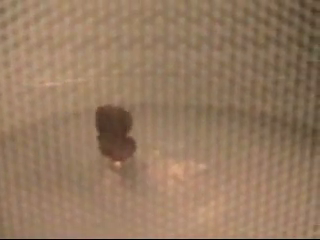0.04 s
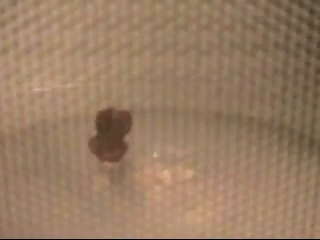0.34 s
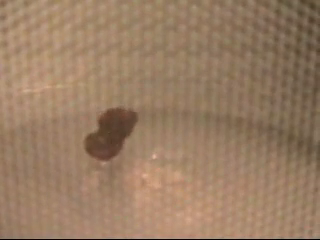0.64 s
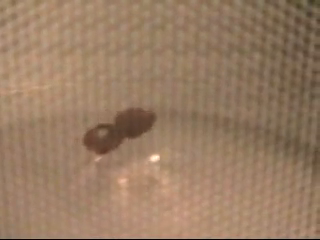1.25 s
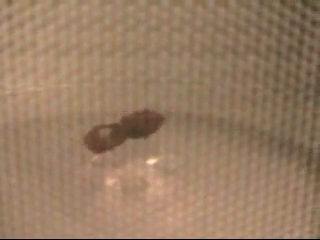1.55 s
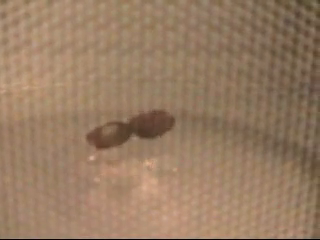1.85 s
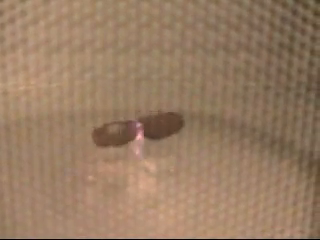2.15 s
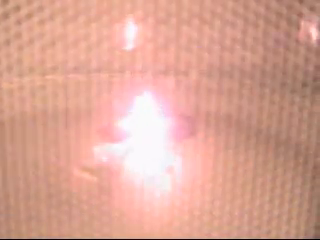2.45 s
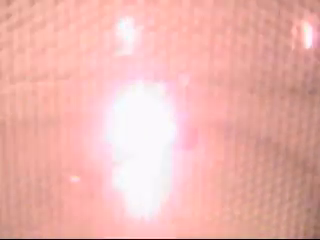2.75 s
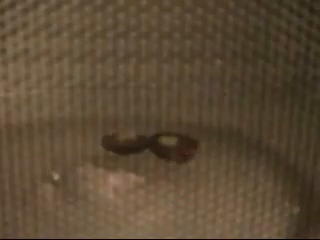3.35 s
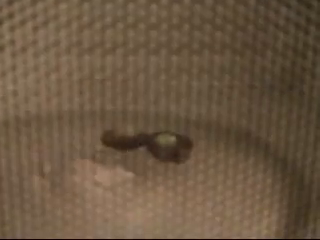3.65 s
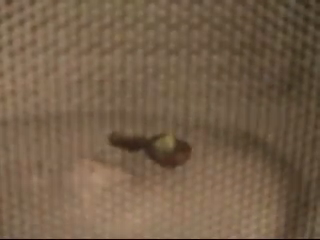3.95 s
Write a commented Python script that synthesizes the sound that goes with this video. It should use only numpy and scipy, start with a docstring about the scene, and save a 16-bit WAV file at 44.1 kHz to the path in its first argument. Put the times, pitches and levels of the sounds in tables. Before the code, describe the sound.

A microwave oven hums while grapes inside arc with a harsh electrical buzz, then stop abruptly.

```python
"""A microwave oven runs: its transformer hums and its cooling fan whirs, beating against the hum.
Two grapes inside spit juice and strike an arc that snaps and fries once per mains cycle,
rings the metal cavity and shifts the hum toward its odd harmonics.
The plasma flutters, flares and goes out at once, leaving the juice to sizzle faintly."""
import sys
import numpy as np
from scipy import signal
from scipy.fft import rfft, irfft
from scipy.io import wavfile
from scipy.ndimage import uniform_filter1d

SR = 44100
rng = np.random.default_rng(int(sys.argv[2]) if len(sys.argv) > 2 else 0)


def pcm_store(signal):
    """Save signal as 16-bit PCM."""
    levels = np.round(np.clip(np.atleast_2d(signal), -1, 1) * 32767)
    wavfile.write(sys.argv[1], SR, levels.astype(np.int16).T)


N = 176400
MAINS_HZ, CREST_S = 59.974, 1.3742
ARC_ON_S, ARC_OFF_S, STRIKE_S, QUENCH_S = 2.207, 3.297, 0.12, 0.0098


def undb(db):
    """Decibels to gain."""
    return 10 ** (np.asarray(db) / 20)


def unit(x):
    """Scale to rms 1."""
    return x / np.sqrt(np.mean(x ** 2))


def curve(rows):
    """Join (time_s, value) rows by straight lines; hold the ends."""
    return np.interp(np.arange(N) / SR, *np.array(rows).T)


def swells(t, rows):
    """Bell-shaped envelopes from (centre_s, half_length_s, level_db) rows."""
    return sum(undb(db) * np.exp(-((t - centre_s) / half_s) ** 2) for centre_s, half_s, db in rows)


def colour(x, points):
    """Minimum-phase filter through (freq_hz, gain_db) points."""
    hz, db = np.array(points).T
    size = 2 * N
    bin_hz = np.arange(N + 1) * SR / size
    gain = undb(np.interp(np.log(bin_hz + 1), np.log(hz), db))
    cepstrum = irfft(np.log(gain))
    cepstrum[1:N] *= 2
    cepstrum[N + 1:] = 0
    return irfft(rfft(x, size) * np.exp(rfft(cepstrum)))[:N]


def resonate(x, rows):
    """Add (centre_hz, width_hz, gain_db) resonances to x."""
    return x + sum(undb(db) * signal.lfilter(*signal.iirpeak(hz, hz / width_hz, fs=SR), x)
                   for hz, width_hz, db in rows)


def walk(rate_hz):
    """Smooth random wander, rms 1."""
    hold = int(SR / rate_hz)
    steps = rng.standard_normal(N)[np.arange(N) // hold]
    return unit(uniform_filter1d(uniform_filter1d(steps, hold), hold))


def crackle(spread_db):
    """Dense tiny bursts of unequal size."""
    return unit(rng.standard_normal(N) * undb(spread_db * walk(2500)))


# mains_multiple, rest_db, arcing_db
HUM_HARMONICS = [(2, -18.5, -28.5), (3, -54, -27), (4, -42, -54), (5, -42.5, -24), (6, -21.5, -26),
                 (7, -42.5, -33), (8, -38.5, -36.5), (10, -21.5, -23.5), (11, -37, -39), (12, -34, -41),
                 (15, -46, -43), (17, -47, -44), (19, -48.5, -51.5), (20, -50, -54.5), (21, -60.5, -56),
                 (23, -49.5, -49.5)]
# Slow swings in the hum's level: time_s, gain_db
HUM_LOAD = [(0, -2.5), (.55, -2), (.75, -0.9), (1.1, -2), (1.28, -1), (1.4, 0.5), (2.0, -0.3), (2.25, -2),
            (2.52, -4), (2.75, 0.5), (3.05, 1), (3.3, -2), (3.48, -1), (3.72, -2), (4, -3.5)]
# time_s, level_db
HUM_FUNDAMENTAL = [(0, -43), (.6, -45), (.9, -37.5), (1.55, -47), (2.05, -40), (2.25, -41), (2.4, -33.5),
                   (2.9, -30), (3.15, -30.5), (3.35, -35), (3.68, -34.5), (4, -38)]


def hum(t, cycles):
    """Transformer and magnetron: mostly even harmonics at rest; odd ones rise under the arc's load."""
    odd_lag_cycles = 0.3263
    burning = np.clip((t - ARC_ON_S) / STRIKE_S, 0, 1) * np.clip((ARC_OFF_S - t) / QUENCH_S + 1, 0, 1)
    harmonics = 0
    for k, rest_db, arcing_db in HUM_HARMONICS:
        k = round(k)
        waver_db = 0.16 * walk(7) + 1.24 * burning * walk(14)
        gain = undb(rest_db) * (1 - burning) + undb(arcing_db) * burning
        harmonics += gain * undb(waver_db) * np.cos(2 * np.pi * k * (cycles - k % 2 * odd_lag_cycles))
    fundamental = undb(curve(HUM_FUNDAMENTAL)) * np.sin(2 * np.pi * cycles)
    return np.sqrt(2) * (harmonics * undb(curve(HUM_LOAD)) + fundamental)


# shaft_multiple, level_db
BLADE_TONES = [(4, -27.5), (5, -40), (8, -30), (12, -37.5), (16, -38.5), (28, -47), (32, -46.5)]
# pitch_hz, level_db
CASING_PANELS = [(943, -39), (1249, -50.5), (1669, -50.5)]
# freq_hz, relative_db
AIR_SPECTRUM = [(25, -82.5), (60, -68), (105, -57), (170, -55.5), (250, -52), (350, -48.5), (450, -57),
                (560, -56), (900, -56.5), (1080, -66), (1420, -63.5), (2000, -71), (2600, -77.5),
                (3600, -84), (4800, -93), (6200, -105), (9500, -113), (12000, -103)]
# centre_hz, width_hz, gain_db
DUCT_MODES = [(2250, 130, -9.5), (2490, 110, -1), (3070, 120, -11), (3620, 260, -7), (4500, 400, -5)]


def fan(t, cycles):
    """Blade tones, shaken panels and ducted air throbbing with the hum; the arc's load slows the shaft."""
    shaft_hz, sag_hz, lead_turns, air_db = 45.728, 0.075, 0.018, -26.5
    burnt_s = np.clip(t, ARC_ON_S, ARC_OFF_S) - ARC_ON_S
    turns = lead_turns + shaft_hz * (t - CREST_S) - sag_hz * burnt_s + 0.005 * walk(3)
    blades = sum(undb(db + 1.1 * walk(13)) * np.cos(2 * np.pi * round(k) * turns)
                 for k, db in BLADE_TONES)
    panels = sum(undb(db + 3.2 * walk(12)) * np.cos(2 * np.pi * hz * t + 0.89 * walk(14))
                 for hz, db in CASING_PANELS)
    throb = 1 + 0.16 * np.cos(4 * np.pi * cycles)
    air = colour(rng.standard_normal(N) * throb, AIR_SPECTRUM)
    air = unit(resonate(air, DUCT_MODES))
    return np.sqrt(2) * (blades + panels) + undb(air_db + 0.34 * walk(4.6)) * air


# centre_s, half_length_s, level_db
JUICE_SPITS = [(1.14, 0.018, -54), (2.277, 0.039, -48.5)]
# freq_hz, relative_db
SPIT_SPECTRUM = [(1500, -17), (3000, 2), (4550, 2.5), (5500, -11), (6300, -14), (9500, -20), (12000, -13)]


def spits(t):
    """Juice spits brightly through the grape skin."""
    return swells(t, JUICE_SPITS) * unit(colour(crackle(spread_db=1.5), SPIT_SPECTRUM))


# centre_hz, width_hz, gain_db
CAVITY_MODES = [(1345, 100, 1), (1460, 100, 2), (1794, 29, 0), (1910, 60, 1.5), (2548, 92, 6.5),
                (2870, 45, 2), (3023, 45, 7), (3630, 120, -1.5), (4520, 35, 0.5), (4730, 70, 0),
                (6000, 65, 4)]


def cavity(x, t, t60_s=0.1, walls_db=-8):
    """The metal box rings and scatters sound between its walls."""
    ringing = resonate(x, CAVITY_MODES)
    walls = rng.standard_normal(N) * np.exp(-np.log(1000) * t / t60_s)
    walls /= np.sqrt(np.sum(walls ** 2))
    return ringing + undb(walls_db) * signal.fftconvolve(ringing, walls)[:N]


def snaps(cycles, grit=0.1, decay_s=0.0012, scatter_db=1.4):
    """One pressure impulse per cycle, each of its own size, with a gritty tail."""
    index = np.floor(cycles - np.floor(cycles[0])).astype(int)
    impulses = np.diff(index, prepend=0)
    age_s = (cycles % 1) / MAINS_HZ
    tails = grit * np.exp(-age_s / decay_s) * rng.standard_normal(N)
    return (tails - impulses) * undb(scatter_db * rng.standard_normal(N)[index])


# time_s, gain_db
ARC_STRENGTH = [(2.15, -27.5), (2.24, -9.5), (2.3, -8), (2.36, -11), (2.48, -8.5), (2.56, -8), (2.68, -11),
                (2.82, -7.5), (2.965, -9.5), (2.988, -2.5), (3.06, -0.5), (3.13, -2), (3.22, 0), (3.29, -2)]


def arc_strength(t, decay_s=0.016):
    """The arc stays faint until it strikes, then flares and dies fast."""
    return undb(curve(ARC_STRENGTH)) * np.exp(-np.maximum(t - ARC_OFF_S, 0) / decay_s)


# freq_hz, relative_db
SNAP_SPECTRUM = [(400, -17.5), (1050, -9.5), (1400, 5.5), (2100, -10), (2800, -7), (3700, -13.5),
                 (5000, -21), (6500, -33), (9500, -41), (12000, -33)]
# freq_hz, relative_db
FRY_SPECTRUM = [(300, -9.5), (800, -2), (1100, -5.5), (1400, -6.5), (2150, -3.5), (2800, -7), (4100, -12.5),
                (5100, -17.5), (5600, -25), (6400, -30), (9500, -33), (12000, -27)]


def arc(cycles, strength):
    """Each mains cycle lights the arc with a weak leader and a snap, then it fries."""
    leader_lead_cycles, snap_lead_cycles, fry_lag_cycles = 0.19, 0.085, 0.14
    ignitions = snaps(cycles + snap_lead_cycles) + undb(-5) * snaps(cycles + leader_lead_cycles)
    buzz = undb(-32.5) * strength ** 1.5 * unit(colour(ignitions, SNAP_SPECTRUM))
    pulsing = 1 + 0.28 * np.cos(2 * np.pi * (cycles - fry_lag_cycles))
    fry = unit(colour(crackle(spread_db=2) * pulsing, FRY_SPECTRUM))
    return buzz + undb(-32) * strength * fry


def singing(strength, pitch_hz=910, width_hz=13):
    """The flare makes the cavity's lowest strong resonance sing."""
    gain = undb(-27 + 2 * walk(30)) * strength ** 2
    phase = 2 * np.pi * np.cumsum(pitch_hz + width_hz / 2 * walk(25)) / SR
    return np.sqrt(2) * gain * np.cos(phase)


# centre_s, half_length_s, level_db
FLAME_PUFFS = [(2.266, 0.05, -36), (2.778, 0.082, -24), (3.058, .035, -21.5), (3.295, .02, -27)]
# freq_hz, relative_db
FLAME_SPECTRUM = [(30, -19.5), (85, 0), (160, 8), (260, -10), (600, -16), (1500, -54.5), (4000, -87)]


def flame(t):
    """Low flutter of the plasma as it swells and collapses."""
    return swells(t, FLAME_PUFFS) * unit(colour(rng.standard_normal(N), FLAME_SPECTRUM))


# freq_hz, relative_db
SIZZLE_SPECTRUM = [(500, -15), (2400, 3), (4500, -11), (6200, -30), (9500, -34.5), (12000, -24.5)]


def sizzle(t, level_db=-45):
    """Juice sizzles on the scorched grapes once the arc is out."""
    onset = np.clip((t - ARC_OFF_S) / QUENCH_S, 0, 1)
    return undb(level_db) * onset * unit(colour(crackle(spread_db=1), SIZZLE_SPECTRUM))


def scene():
    """Oven and grapes; hum, air throb and arc share the mains phase."""
    t = np.arange(N) / SR
    cycles = MAINS_HZ * (t - CREST_S)
    strength = arc_strength(t)
    oven = hum(t, cycles) + fan(t, cycles)
    grapes = arc(cycles, strength) + spits(t)
    return (oven + singing(strength) + cavity(grapes, t) + flame(t) + sizzle(t))[None]


# freq_hz, gain_db
TREBLE_NOTCH = [(6600, -0.5), (7200, -16), (7700, -30), (8400, -29), (9200, -4.5), (10000, -1)]


def record(dry, cutoff_hz=12850):
    """Treble notch near 8 kHz and a steep top cut, as of low-rate resampled audio."""
    lowpass = signal.ellip(10, 0.2, 80, cutoff_hz, fs=SR, output="sos")
    return signal.sosfilt(lowpass, colour(dry[0], TREBLE_NOTCH))[None]


dry = scene()
out = record(dry)
pcm_store(out)
```